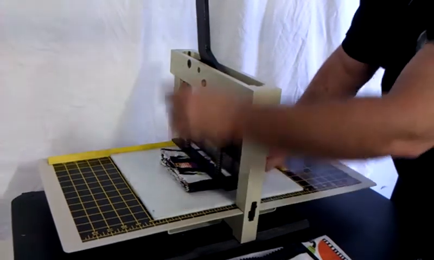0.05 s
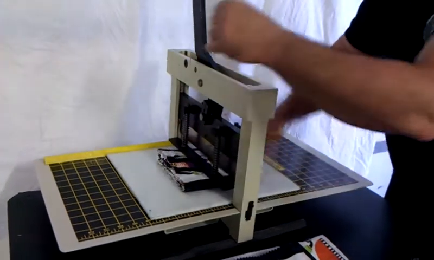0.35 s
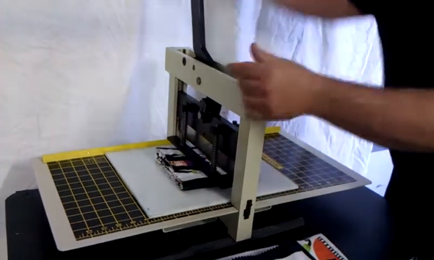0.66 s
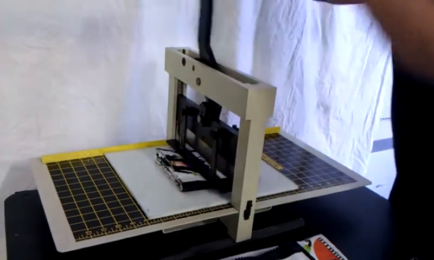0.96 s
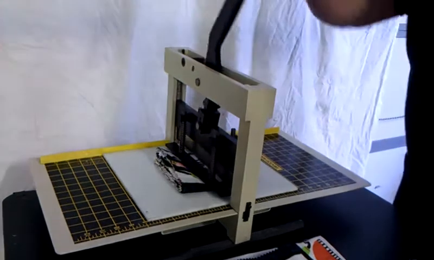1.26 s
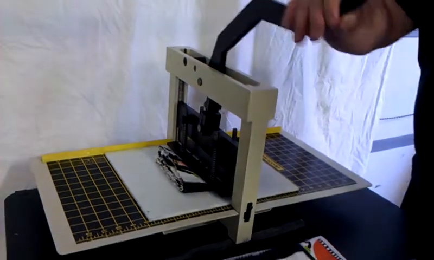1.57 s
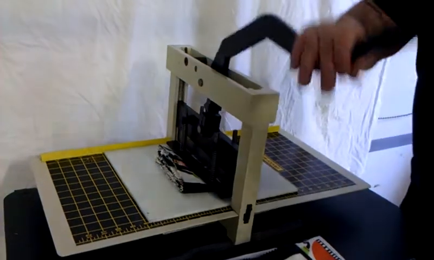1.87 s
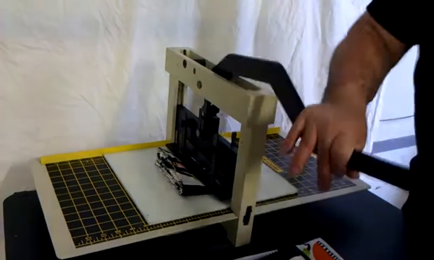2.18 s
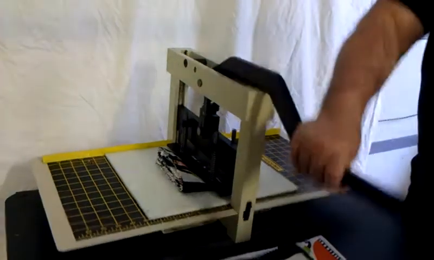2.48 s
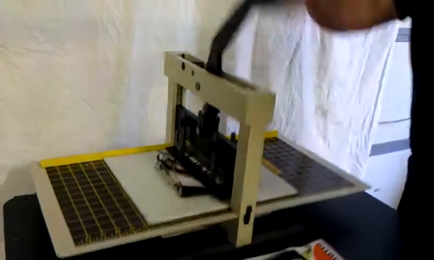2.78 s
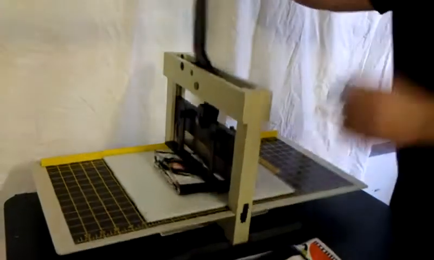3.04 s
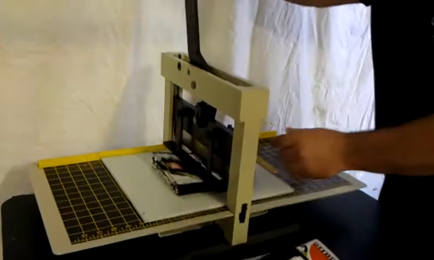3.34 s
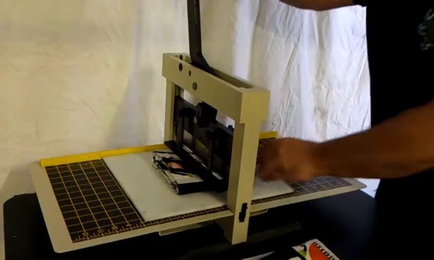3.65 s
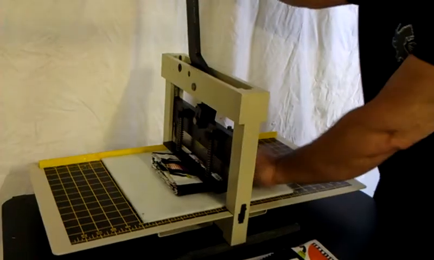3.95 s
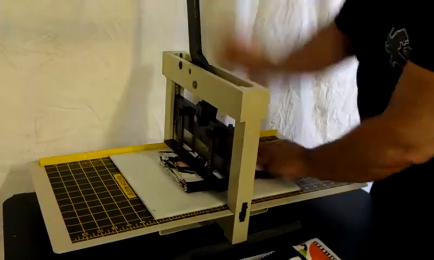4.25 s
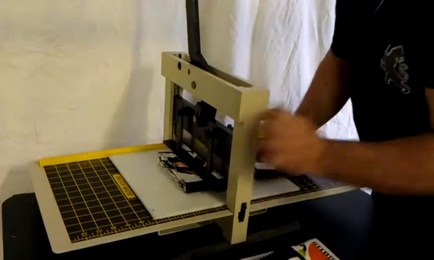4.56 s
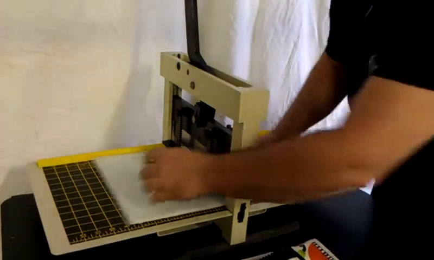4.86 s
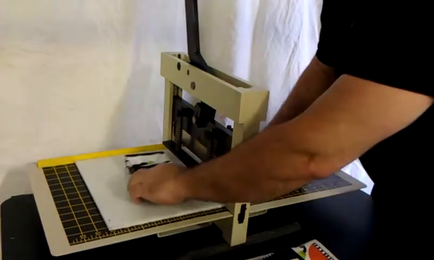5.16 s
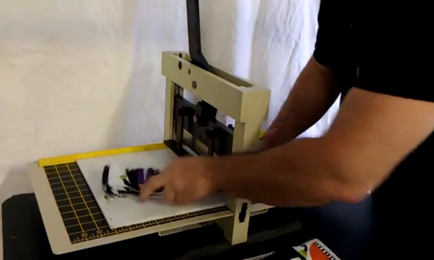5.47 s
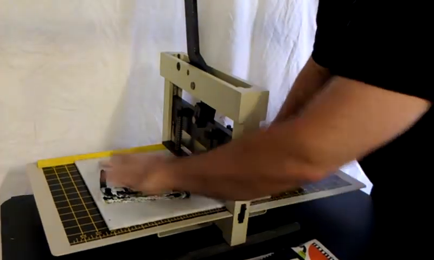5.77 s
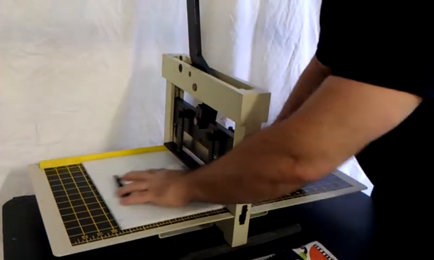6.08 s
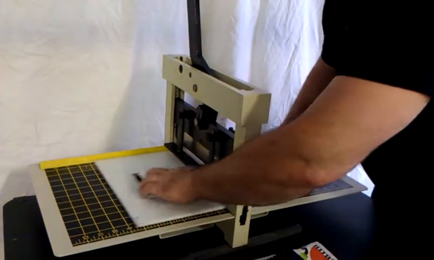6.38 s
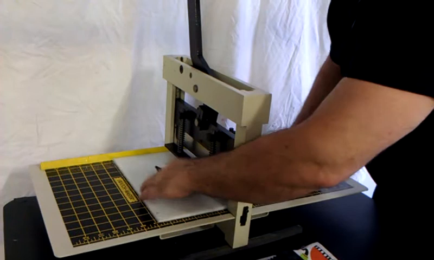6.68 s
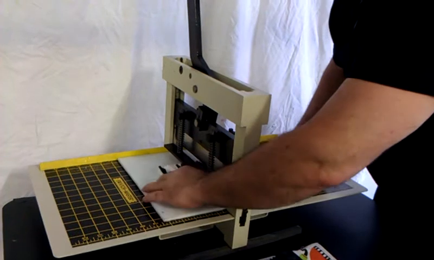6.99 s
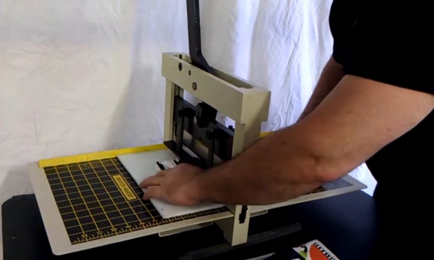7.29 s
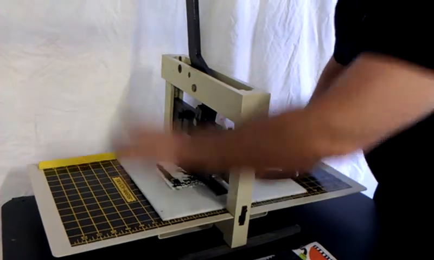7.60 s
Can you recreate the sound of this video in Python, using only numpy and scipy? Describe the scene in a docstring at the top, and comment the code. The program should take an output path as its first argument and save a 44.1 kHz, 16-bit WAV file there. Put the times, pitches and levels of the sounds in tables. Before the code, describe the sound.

A few light clacks and a brief rub of joints lead to one sharp, ringing metal snap as a hand press cuts through fabric. A quick run of knocks and rattles follows as the lever springs back and hits its stop. Afterwards, hands quietly drag a plastic board out, gather cloth and push the board back with small ticks. A faint steady rush fills the small, slightly echoing room.

```python
"""In a small workshop, over a low room noise, a hand pulls down the lever of a fabric-cutting press.
The lever knocks and rubs on its way down, until the cut gives way with a crack and a ring of steel.
The lever then flies back and rattles against its stop.
Last, hands pull out the plastic cutting board, gather the swatches and slide the board back."""
import sys
import numpy as np
from scipy import signal
from scipy.fft import rfft, irfft, next_fast_len
from scipy.io import wavfile
from scipy.ndimage import uniform_filter1d

SR = 44100
rng = np.random.default_rng(int(sys.argv[2]) if len(sys.argv) > 2 else 0)


def output_pcm(signal):
    """Save a mono or channel-first signal as 16-bit PCM at the path in sys.argv[1].

    Samples are clipped to [-1, 1] before scaling.
    """
    pcm = np.clip(np.atleast_2d(signal).T, -1, 1) * 32767
    wavfile.write(sys.argv[1], SR, np.round(pcm).astype(np.int16))


N = 340880
T = np.arange(int(.7 * SR)) / SR  # the seconds of one blow as it dies away
# In the tables, levels are relative, and "fade" is the time a sound takes to drop by 60 dB.

# the cut giving way: (time [s], ring level [dB], clang level [dB], crack level [dB])
SNAPS = [(2.336, -13.3, -16.5, 2.5)]
# the notes of the steel press: (pitch [Hz], level [dB], fade [s])
STEEL_NOTES = [(1287, -20, .5), (1620, -9, .36), (1872, -1.5, .37), (1907, -7, .37), (1925, -7, .36),
               (1985, -3, .4), (2089, -9, .36), (2408, -7, .3), (2433, -2, .32), (2482, -8, .32),
               (2512, -7, .32), (2635, -10, .34), (3181, 0, .38), (3243, 0, .38), (3304, -4, .38),
               (3329, -8, .35), (3353, -9, .36), (4360, -12, .36), (4925, -7, .32), (5780, -13, .33),
               (6476, -11, .3), (6713, -10, .3)]
# tone colours, or how strong the lows and highs are: (frequency [Hz], level [dB])
CLANG_COLOUR = [(35, -74.5), (60, -32), (108, -21), (216, -17), (314, -7.5), (449, -8.5), (615, -15.5),
                (1420, -15), (1910, -10), (2720, -13), (3220, -3), (3650, -15), (5440, -16.5),
                (6710, -14.5), (9000, -42), (11700, -81), (19800, -120)]
CRACK_COLOUR = [(200, -22), (1500, -9.5), (4000, -17), (7000, 3.5), (8600, -3.5), (10000, 17.5),
                (16000, 11)]
def cutting_snap(tear_s=0.031):
    """The load lets go at once: a brief, very bright crack, then the whole steel press rings."""
    out = np.zeros(N)
    for time, ring_db, clang_db, crack_db in SNAPS:
        add(out, time, amp(ring_db) * ring(STEEL_NOTES, spread_db=0, detune=0) * onset(0.013))
        add(out, time, amp(clang_db) * burst(CLANG_COLOUR, 0.44))
        add(out, time, amp(crack_db) * burst(CRACK_COLOUR, 0.13) * np.exp(-(T / tear_s) ** 2))
    return out


# blows as the lever goes down, the lever flies back and the board is pulled out:
# (time [s], clack level [dB], thud level [dB], tick level [dB], clack and tick fade [s])
BLOWS = [ (0.761, -49.5, -52.5, -67, .05), (0.831, -48.5, -53.5, -70, .04), (1.058, -29, -61, -50, 0.023),
         (1.062, -21, -39, -42.5, 0.011), (1.282, -42.5, -60, -57, 0.045), (1.458, -46, -52.5, -51, 0.024),
         (1.58, -24, -29.5, -37, 0.023), (1.678, -51, -39.5, -76, .037), (1.771, -39, -51, -42.5, 0.055),
         (1.795, -41.5, -39, -61.5, 0.033), (2.065, -34.5, -33.5, -59, .031),
         (2.262, -42, -36.5, -76.5, 0.032), (2.607, -47.5, -26.5, -62.5, 0.045),
         (2.637, -38, -38, -69, 0.037), (2.676, -42, -40, -50, 0.14), (2.738, -37, -22.5, -54.5, 0.085),
         (2.823, -42, -42.5, -64, .04), (2.909, -37.5, -44, -45, .026), (2.928, -22.5, -34.5, -52, 0.022),
         (2.996, -33, -33, -39, 0.17), (3.088, -25.5, -32.5, -46.5, 0.096), (3.116, -22, -29.5, -35, .033),
         (3.158, -31, -31, -48, .06), (3.210, -24.5, -31, -36, 0.031), (3.253, -30, -11, -40, 0.23),
         (3.275, -37, -19, -46, .05), (3.297, -17, -27, -26, .06), (3.315, -20.5, -30.5, -24, 0.036),
         (3.384, -23.5, -33, -40.5, 0.083), (3.412, -30, -41, -39, 0.022), (3.613, -43, -53.5, -61, .033),
         (3.801, -32.5, -54, -44, 0.02), (4.549, -44.5, -57.5, -54, 0.021), (5.025, -40, -56, -59, 0.023)]
# the notes of each struck part: (pitch [Hz], level [dB], fade [s])
TABLE_NOTES = [(83, -32.5, 0.13), (132, -17.5, 0.19), (176.3, -4.5, 0.12), (254, .5, 0.083),
               (310, -2, 0.12), (405, 4, .11), (444, -7, 0.067), (524, -1, 0.086)]
FRAME_NOTES = [(785, -10, 0.029), (950, -15, 0.036), (1173, 0.5, 0.033), (1390, -7, 0.079),
               (1634, -11.5, 0.04)]
LEVER_NOTES = [(2480, -0.5, 0.038), (2785, -0.5, 0.042), (2946, 3.5, 0.021), (3740, -6.5, 0.016),
               (4246, -4, 0.0089)]
# the noise of table, frame, lever and contact point: (frequency [Hz], level [dB])
THUD_COLOUR = [(30, -33), (90, -20), (160, -4), (420, 2.5), (560, -4.5), (700, -14.5), (1000, -10.5),
               (1600, -30.5), (4000, -54.5)]
KNOCK_COLOUR = [(300, -27.5), (750, -8.5), (1150, 0.5), (1550, -2.5), (2200, -10.5), (3200, -23.5),
                (6000, -44.5)]
CLACK_COLOUR = [(1000, -23.5), (2000, -4.5), (2800, 3.5), (3600, -3.5), (4600, -2), (5600, -17),
                (8000, -36.5), (10000, -51.5)]
TICK_COLOUR = [(1000, -37.5), (3000, -4.5), (4800, -4.5), (6800, -1.5), (8200, -9), (9300, -8),
               (14000, -20)]
def press_knocks(lever_share=0.54):
    """Each blow ticks where it lands, clacks in the lever, knocks in the frame and thuds in the table."""
    out = np.zeros(N)
    for time, clack_db, thud_db, tick_db, fade in BLOWS:
        # the frame sits between lever and table, so it takes its strength from both
        knock_db = lever_share * clack_db + (1 - lever_share) * thud_db - 10
        knock_db += 0.22 * (clack_db - tick_db)  # a soft blow ticks less and knocks more
        echo = room_echo()
        thud = ring(TABLE_NOTES, spread_db=0.5, detune=0.014) + amp(-1.5) * burst(THUD_COLOUR, 0.097)
        knock = amp(-5) * ring(FRAME_NOTES, spread_db=1, detune=0.036) + burst(KNOCK_COLOUR, 0.032)
        clack = amp(-8) * ring(LEVER_NOTES, spread_db=4, detune=0.02) + burst(CLACK_COLOUR, fade)
        tick = burst(TICK_COLOUR, fade)
        add(out, time, amp(thud_db - 2) * unit_peak(in_room(thud * onset(0.0028), echo, echo_db=-6.5)))
        add(out, time, amp(knock_db) * unit_peak(in_room(knock * onset(0.0012), echo, echo_db=-3)))
        add(out, time, amp(clack_db - 9) * unit_peak(in_room(clack * onset(0.0004), echo, echo_db=-4)))
        add(out, time, amp(tick_db + 2) * unit_peak(in_room(tick * onset(0.003), echo, echo_db=-6)))
    return out


# notes left ringing by a blow: (time [s], pitch [Hz], level [dB], fade [s])
RINGING_NOTES = [(1.084, 428, -32, 0.2), (1.583, 426, -25.5, 0.16), (1.583, 567, -27.5, 0.081),
                 (2.264, 1090, -26, 0.033), (2.93, 1430, -25, 0.066), (2.994, 4130, -35, 0.18),
                 (2.994, 7300, -30.5, 0.092), (3.089, 1140, -24, 0.11), (3.159, 533, -25, 0.22),
                 (3.315, 3675, -32.5, 0.68)]
def blow_rings():
    """Some blows leave a note or two ringing: low in the table, mid in the frame, high in loose steel."""
    out = np.zeros(N)
    for time, hz, db, fade in RINGING_NOTES:
        add(out, time, amp(db) * dying(fade) * onset(0.0036) * np.sin(2 * np.pi * hz * T))
    return out


# spells of rattling: (start [s], swelling [s], steady [s], dying [s], level [dB])
RATTLES = [(3.05, .08, 0.19, .5, -49), (3.27, 0.061, 0.043, .2, -32.5)]
# the tone of the rattle: (frequency [Hz], level [dB])
RATTLE_TONE = [(35, -79), (60, -28), (255, 3), (372, -1.5), (431, -10), (641, -5.5), (712, -5), (916, -5.5),
               (3430, -5), (3650, -5), (3890, -7.5), (7300, -35), (9000, -34), (11700, -70), (19800, -120)]
def loose_rattle():
    """Loose parts rattle as the lever flies back, and again when it stops."""
    return friction(RATTLE_TONE, strokes(RATTLES), slips_per_s=550, spread_db=1.5, smooth=0.47)


# the lever's downward swing: (start [s], speeding up [s], steady [s], slowing [s], level [dB])
LEVER_SWING = [(1.845, 0.096, 0.062, 0.085, -37.5)]
# the tone of its rubbing joints: (frequency [Hz], level [dB])
JOINT_COLOUR = [(71, -58), (120, -20), (296, -6), (355, -19), (425, 1), (785, -19.5), (1170, -11),
                (2160, -13.5), (2830, -7), (3920, -12.5), (6740, -6.5), (8220, -18), (9000, -26),
                (11700, -64), (19800, -120)]
def joint_rub():
    """The lever's joints rub as it swings down."""
    return friction(JOINT_COLOUR, strokes(LEVER_SWING), slips_per_s=3500, spread_db=4, smooth=0.95)


# pushes and pulls of fabric and board:
# (start [s], speeding up [s], steady [s], slowing [s], fabric level [dB], board level [dB])
SLIDES = [(3.86, 0.071, 0.24, .1, -62.5, -75), (4.04, 0.075, 0.0052, 0.45, -53.5, -62),
          (4.71, 0.17, 0.018, .21, -42, -51.5), (5.11, 0.032, 0.27, .08, -58.5, -71.5),
          (5.39, 0.062, 0, 0.063, -50.5, -64), (5.84, 0.18, 0.034, 0.31, -53, -59),
          (6.2, 0.2, 0.29, 0.32, -54.5, -60.5), (6.93, .14, 0, 0.15, -67, -82),
          (7.38, .05, 0, 0.07, -59, -65.5), (7.5, 0.15, 0.015, 0.092, -69.5, -68)]
# a soft hiss and the board's scrape: (frequency [Hz], level [dB])
HISS_COLOUR = [(1500, -10), (3900, -7.5), (4600, -3), (5150, -7.5), (5900, -9.5), (6600, -1.5),
               (7800, -5.5), (9000, -17), (11000, -22)]
SCRAPE_COLOUR = [(50, -33), (170, 0.5), (300, 5.5), (440, 11.5), (720, -17), (1020, 1), (1600, -12),
                 (2900, 1), (3900, -12), (5500, -25), (9000, -26)]
def fabric_and_board():
    """With each push or pull the fabric hisses and the board scrapes."""
    fabric = friction(HISS_COLOUR, strokes(SLIDES), slips_per_s=620, spread_db=1, smooth=1)
    board = friction(SCRAPE_COLOUR, strokes(SLIDES, column=1), slips_per_s=510, spread_db=4, smooth=0.54)
    return amp(-3.5) * rasp(fabric) + board


# where dragged cloth rings: (pitch [Hz], width [Hz], level [dB])
RASP_BANDS = [(4700, 260, -1), (5260, 300, 4)]
def rasp(x):
    """Dragged cloth rings in narrow bands on top of its own hiss."""
    return x + sum(amp(db) * signal.lfilter(*signal.iirpeak(hz, hz / width, fs=SR), x)
                   for hz, width, db in RASP_BANDS)


# catches of the sliding board: (time [s], level [dB])
BOARD_CATCHES = [(5.025, -35.5), (5.1485, -46), (5.493, -46), (6.3974, -34), (6.6796, -30.5), (6.698, -39),
                 (6.865, -42.5)]
def board_clicks():
    """The board catches on the base with very short clicks that ring like the rasp."""
    out = np.zeros(N)
    for time, db in BOARD_CATCHES:
        click = rasp(burst(TICK_COLOUR, 0.016) + amp(-20) * burst(CLACK_COLOUR, 0.011))
        add(out, time, amp(db - 4) * unit_peak(in_room(click, room_echo(), echo_db=-8.5), samples=132))
    return out


# hand movements: (start [s], speeding up [s], steady [s], slowing [s], level [dB])
HAND_MOVES = [(.02, 0.1, 0, 0.074, -67.5), (.19, 0.1, 0.03, 0.083, -65), (.68, 0.22, 0.33, 0.35, -65.5),
              (1.2, 0.17, 0.66, 0.47, -58.5), (2.35, 0.22, 0.62, 1, -59.5),
              (3.82, 0.023, 0.01, 0.065, -52.5)]
def hand_brush():
    """Hands brush over the press and lever with a faint hiss."""
    return friction(HISS_COLOUR, strokes(HAND_MOVES), slips_per_s=2000, spread_db=8, smooth=0.8)


# how long the room echoes: (frequency [Hz], fade [s])
ECHO_FADES = [(150, .42), (400, 0.5), (1000, 0.33), (2800, 0.43), (7500, 0.22)]
def room_echo():
    """Sound bounces around the room, and lows and highs die away at their own speeds."""
    hz, t, bands = signal.stft(rng.standard_normal(len(T)), SR, nperseg=256)
    bands *= np.exp(-np.log(1000) * t / look_up(ECHO_FADES, hz)[:, None])
    echo = signal.istft(bands, SR, nperseg=256)[1][:len(T)] * onset(0.0011) ** 2
    return echo / np.linalg.norm(echo)


# the room's steady rush: (frequency [Hz], level [dB])
RUSH_COLOUR = [(18, -77), (30, -51), (85, -37.5), (113, -9.5), (185, -13), (290, 1), (319, -8), (359, 0.5),
               (385, -7.5), (413, -3.5), (1380, -19), (1960, -17.5), (2260, -20.5), (2940, -19.5),
               (8500, -29.5), (11000, -69), (18700, -120)]
# a hum and a thin whine: (pitch [Hz], level [dB])
HUM_NOTES = [(360.7, -71), (1798, -79.5), (1922, -79.5), (2040, -87), (2159, -89.5), (2638, -83.5),
             (2880, -81.5), (13180, -75.5)]
def room_noise():
    """A low, fan-like rush with a faint wavering hum."""
    t, hum = np.arange(N) / SR, np.zeros(N)
    for hz, db in HUM_NOTES:
        waver = 0.92 * np.interp(t, np.linspace(0, t[-1], 40), rng.standard_normal(40))
        hum += amp(db) * np.sqrt(2) * np.sin(2 * np.pi * hz * t + waver)
    return amp(-61) * coloured(rng.standard_normal(N), RUSH_COLOUR) + hum


def in_room(x, echo, echo_db):
    """The direct sound plus its echo."""
    return x + amp(echo_db) * signal.fftconvolve(x, echo)[:len(x)]


def ring(notes, spread_db, detune):
    """A struck part sounds all its notes; each blow lands elsewhere and mixes them differently."""
    hz, db, fade = np.transpose(notes)[:, :, None]
    weight, shift, side = rng.standard_normal((len(notes), 3)).T[:, :, None]
    gain = np.sign(side) * amp(db + spread_db * weight)
    waves = gain * dying(fade) * np.sin(2 * np.pi * hz * (1 + detune * shift) * T)
    return waves.sum(0) / np.sqrt(np.sum(gain ** 2) / 2)


def burst(colour, fade):
    """Countless overlapping notes blur into a noise that dies away."""
    return coloured(rng.standard_normal(len(T)), colour) * dying(fade)


def friction(colour, gain, slips_per_s, spread_db, smooth):
    """Tiny uneven slips, each a brief scuff, over a smooth rub; the surface colours them."""
    sizes = amp(spread_db * np.minimum(rng.exponential(1, N), 3))
    slips = sizes * (rng.random(N) < slips_per_s / SR)
    scuffs = signal.oaconvolve(slips, dying(0.014))[:N]
    return gain * coloured((unit_level(scuffs) + smooth) * rng.standard_normal(N), colour)


def strokes(rows, column=0):
    """Loudness of a series of rubs: each speeds up, holds its speed and slows to rest."""
    t, power = np.arange(N) / SR, np.zeros(N)
    for start, rise, hold, fall, *levels in rows:
        speed = np.interp(t, start + np.cumsum([0, rise, hold, fall]), [0, 1, 1, 0])
        power += (amp(levels[column]) * speed ** 1.3) ** 2  # faster is louder
    return np.sqrt(power)


def onset(rise_s):
    """A contact takes a moment to build up its force."""
    return 1 - np.exp(-T / rise_s)


def dying(fade):
    """Drops by 60 dB every `fade` seconds."""
    return np.exp(-np.log(1000) * T / fade)


def coloured(x, colour):
    """Gives x a tone colour, at an average level of 1."""
    size = next_fast_len(len(x))
    gains = amp(look_up(colour, np.fft.rfftfreq(size, 1 / SR)))
    return unit_level(irfft(rfft(x, size) * gains, size)[:len(x)])


def look_up(table, hz):
    """Reads between a table's rows, with octaves evenly spaced."""
    frequencies, values = np.transpose(table)
    return np.interp(np.log(hz + 1), np.log(frequencies + 1), values)


def amp(db):
    """Turns decibels into a multiplier."""
    return 10 ** (np.asarray(db) / 20)


def unit_level(x):
    """Scales the average (rms) level to 1."""
    return x / np.sqrt(np.mean(x ** 2) + 1e-20)


def unit_peak(x, samples=440):
    """Scales the loudest few milliseconds to level 1."""
    return x / np.sqrt(uniform_filter1d(x ** 2, samples).max() + 1e-20)


def add(mix, time, sound):
    """Mixes a sound in at a time in seconds."""
    part = mix[round(time * SR):][:len(sound)]
    part += sound[:len(part)]


def low_pass(x, hz, taps):
    """Steeply cuts the treble above hz."""
    return signal.oaconvolve(x, signal.firwin(taps, hz, window=("kaiser", 9), fs=SR), "same")


def scene():
    """The press, the board and the room together, in mono."""
    hits = press_knocks() + blow_rings() + board_clicks() + cutting_snap()
    rubs = hand_brush() + joint_rub() + loose_rattle() + fabric_and_board()
    return (hits + in_room(rubs, room_echo(), echo_db=-8) + room_noise())[None]


def record(dry, limit_db=-18, recover_db_per_s=130):
    """The microphone loses bass and treble; a limiter quickly turns loud peaks down, then eases off."""
    x = signal.sosfilt(signal.butter(1, 139, "high", fs=SR, output="sos"), dry[0])
    x = low_pass(x, hz=8527, taps=201) + amp(-29) * x  # a little top treble leaks through
    level_db = 10 * np.log10(abs(uniform_filter1d(x ** 2, size=200)) + 1e-12)
    recovery = recover_db_per_s * np.arange(N) / SR
    held_db = np.maximum.accumulate(level_db + recovery) - recovery
    cut_db = uniform_filter1d(np.maximum(held_db - limit_db, 0), size=60)
    return low_pass(x / amp(cut_db), hz=15900, taps=255)[None]


dry = scene()
out = record(dry)
output_pcm(out)
```